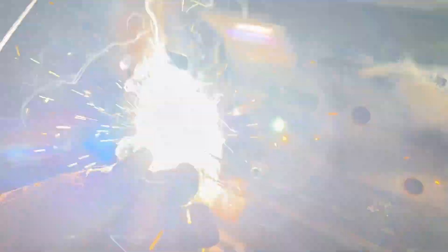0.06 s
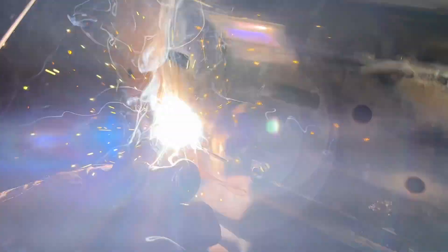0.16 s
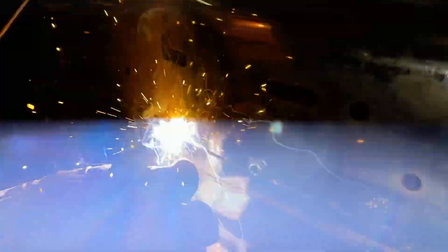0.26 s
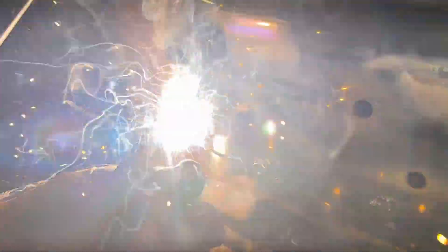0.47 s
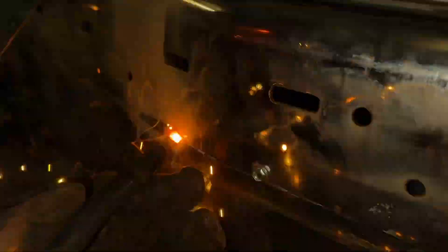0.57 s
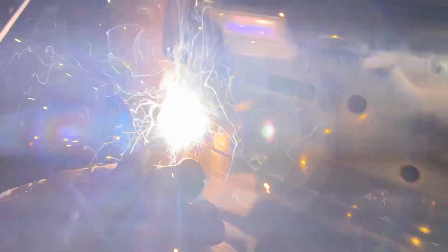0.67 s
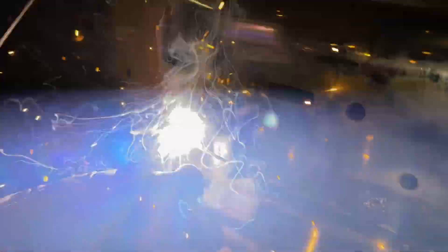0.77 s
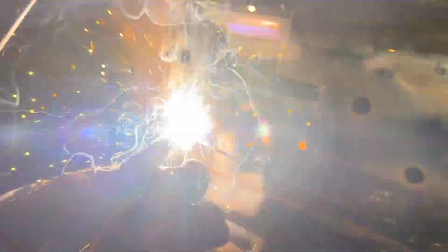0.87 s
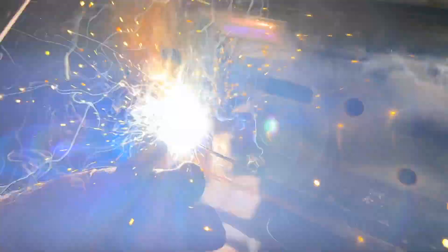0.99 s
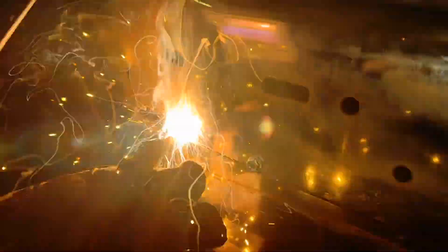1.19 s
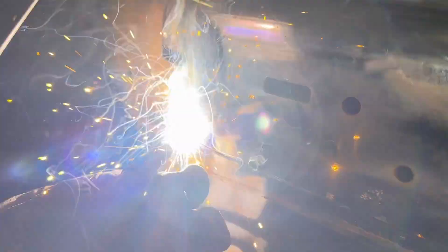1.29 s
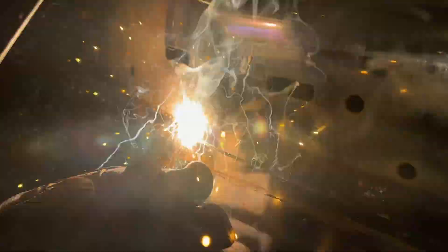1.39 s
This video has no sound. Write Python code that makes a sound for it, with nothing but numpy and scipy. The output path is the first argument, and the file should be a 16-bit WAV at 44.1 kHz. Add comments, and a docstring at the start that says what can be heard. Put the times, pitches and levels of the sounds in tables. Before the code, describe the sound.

A wire-feed welding arc crackles right by a small stereo microphone in a garage: sharp snaps and falling thumps, a brief lull with one click, then crowding thumps, thick snaps and renewed sizzle over faint hum.

```python
"""A wire-feed arc welds steel close to a small stereo microphone, over a low wavering hum.
First sharp snaps and thumps that slide from high to low, then a lull holding one flat click.
The thumps crowd in and grow before half a second, the hum swells and drops, and snaps come thick.
Another lull ends in a heavy thump; later the arc dies down once more, sizzles up and snaps to the end.
Sizzle is random clicks and hiss, snaps are ticks with noise tails, thumps are falling sine glides."""
import sys
import numpy as np
from scipy import signal
from scipy.fft import rfft, irfft, next_fast_len
from scipy.io import wavfile
from scipy.ndimage import uniform_filter1d

SR = 44100
rng = np.random.default_rng(int(sys.argv[2]) if len(sys.argv) > 2 else 0)


def master(y):
    """Save y as 16-bit WAV."""
    cut = np.clip(np.atleast_2d(y).T, -1, 1)
    pcm = np.round(cut * 32767)  # scale
    wavfile.write(sys.argv[1], SR, pcm.astype(np.int16))


N = 63945


def undb(db):
    """dB to gain."""
    return 10 ** (np.asarray(db) / 20)


def unit(x):
    """Scale to rms 1."""
    return x / np.sqrt(np.mean(x ** 2))


def curve(table):
    """Gain along a table of t/s, level/dB."""
    t, db = np.array(table).T
    return undb(np.interp(np.arange(N) / SR, t, db))


def shape(x, gain):
    """Filter by a function of frequency."""
    size = next_fast_len(N + 4096)
    hz = np.arange(size // 2 + 1) * SR / size + 1e-3  # never exactly 0
    return irfft(rfft(x, size) * gain(hz), size)[:N]


# colour of the arc close up: f/Hz, level/dB
ARC_COLOUR = [(200, -30), (500, -5.5), (1000, -8.5), (1600, -7), (2600, -12.5), (3700, -5), (5200, -11),
              (6500, -2), (8000, -10), (9200, -4), (10500, -2.5), (13000, -7), (15200, -2), (16500, -21.5)]


def colour(hz):
    """Gain of the arc's spectrum, interpolated over log frequency."""
    at, db = np.array(ARC_COLOUR).T
    return undb(np.interp(np.log(hz), np.log(at), db))


# strength of the sizzle, which dies down in the lulls: t/s, level/dB (before the lift in sizzle())
SIZZLE_LEVEL = [(0.0, -34), (0.024, -36.5), (0.088, -41), (0.096, -85), (0.112, -35.5), (0.184, -62),
                (0.192, -50.5), (0.294, -41.5), (0.318, -55), (0.326, -39), (0.366, -34.5), (0.424, -40),
                (0.428, -54.5), (0.44, -40), (0.48, -37), (0.492, -30.5), (0.58, -38.5), (0.638, -31.5),
                (0.674, -31.5), (0.682, -39), (0.73, -35), (0.742, -32), (0.754, -37.5), (0.766, -26),
                (0.818, -62.5), (0.832, -53), (0.864, -34), (0.88, -33), (0.956, -40.5), (0.972, -33),
                (0.996, -46.5), (1.004, -35), (1.086, -67), (1.098, -51), (1.114, -42), (1.122, -31.5),
                (1.158, -43), (1.182, -34), (1.222, -48.5), (1.234, -37.5), (1.244, -38), (1.28, -33),
                (1.336, -28.5), (1.352, -36.5), (1.45, -33.5)]
CLICKS_PER_S, CLICK_SPREAD_DB, HISS_DB = 1500, 4.0, -5  # hiss relative to the clicks
FLICKER_DB, FLICKER_PER_S = 1.5, 320  # flicker depth before smoothing


def sizzle():
    """Dense clicks of very uneven size over hiss, flickering together in level."""
    chance = rng.random((3, N))
    struck = chance[0] < CLICKS_PER_S / SR
    size_db = np.minimum(-CLICK_SPREAD_DB * np.log(chance[2] + 1e-9), 18)
    clicks = struck * np.sign(chance[1] - .5) * undb(size_db)
    hold = int(SR / FLICKER_PER_S)
    steps = np.repeat(rng.standard_normal(N // 20), hold)[:N]
    flicker = uniform_filter1d(steps, hold // 2)
    hiss = undb(HISS_DB) * rng.standard_normal(N)
    mix = undb(FLICKER_DB * flicker) * (unit(clicks) + hiss)
    return curve(SIZZLE_LEVEL) * 1.15 * unit(shape(mix, colour))


GLIDE_CYCLES, GLIDE_START_S, GLIDE_END_HZ = 1.2, 0.0004413, 49.6


def glide(age):
    """A sine whose pitch falls as cycles / (age + start), settling at the end pitch."""
    falling_hz = GLIDE_CYCLES / (age + GLIDE_START_S)
    hz = (falling_hz ** 4 + GLIDE_END_HZ ** 4) ** .25
    return np.sin(2 * np.pi * np.cumsum(hz) / SR)


# spits of the arc: t/s, level/dB (before SNAP_DB and colouring),
# low-mid level/dB against that level (before SNAP_LOW_DB)
SNAP_EVENTS = [(0.0096, -32, -9), (0.0475, -18, -27), (0.0615, -19, -28), (0.067, -11, -13),
               (0.0772, -16, -0.5), (0.0863, -13, -9), (0.111, -23, -11), (0.2363, -20, -10),
               (0.2705, -30, -6), (0.2984, -21.5, -14), (0.3283, -17, -14), (0.3471, -13.5, -19),
               (0.3687, -10, -8), (0.389, -14.5, -0.5), (0.4081, -21, -20), (0.4348, -22, -1),
               (0.4386, -17, 13.5), (0.451, -20, 9), (0.4652, -23.5, 16), (0.4876, -16.5, 11.5),
               (0.5143, -12.5, -34), (0.5557, -17, -23), (0.5642, -15, -14), (0.584, -13.5, -22),
               (0.5992, -16, -36), (0.633, -12, -31), (0.6388, -11, -2), (0.6487, -12, -10.5),
               (0.665, -18, -18), (0.6834, -4, -20.5), (0.6913, -9, -6), (0.698, -8.5, -14),
               (0.7033, -16, -6), (0.7424, -6.5, -9), (0.7637, -21.5, 6), (0.7778, -19, 0),
               (0.8332, -4, -18), (0.8389, -13, -13), (0.8469, -9, 3.5), (0.8653, -17, -17),
               (0.8711, -21, -29), (0.917, -14.5, -20), (0.9692, -10, -10), (0.981, -20, -22),
               (1.0067, -14.5, -11), (1.0998, -27, -12), (1.1241, -10, -10), (1.1462, -31, -6),
               (1.1805, -14, -8.5), (1.2353, -14, -24), (1.2777, -16, -34), (1.301, -19, -25),
               (1.3387, -9.5, -8), (1.346, -14, -10), (1.39, -15, -12)]
SNAP_DB, SNAP_LOW_DB, SPLIT_HZ = 3, 8.5, 5160
SNAP_TAIL_DB, SNAP_TAIL_S = -18.5, 0.0021
CRACK_RISE_S, CRACK_FALL_S, CRACK_ROUGH_DB, CRACK_LOW_HZ = 0.00015, 0.00041, 2, 1390
BODY_HZ, BODY_WIDTH_HZ, BODY_DB = 1630, 550, 3.5  # low-mid emphasis of a snap


def snaps():
    """A sharp tick with a noise tail; its low-mids are a short crack, the head of a thump's slide."""
    high, low, age = np.zeros(N), np.zeros(N), np.arange(400) / SR
    crack_env = (1 - np.exp(-age / CRACK_RISE_S)) ** 2 * np.exp(-age / CRACK_FALL_S)
    crack = glide(age) * crack_env
    noises = rng.standard_normal((len(SNAP_EVENTS), 400))
    for (t, db, low_db), noise in zip(SNAP_EVENTS, noises):
        way = np.sign(noise[0])
        tail = noise * undb(SNAP_TAIL_DB) * np.exp(-age / SNAP_TAIL_S)
        tick = np.r_[way * 3.96, tail[1:]]
        start = int(t * SR)
        high[start:start + 400] += undb(db + SNAP_DB) * tick
        # a snap that starts a thump cracks in step with it
        near = min(THUMP_EVENTS, key=lambda row: abs(row[0] - t))
        if abs(near[0] - t) < .0012:
            start, way = int(near[0] * SR), np.sign(near[3])
        rough_crack = way * crack + undb(CRACK_ROUGH_DB) * tail
        low[start:start + 400] += undb(db + low_db + SNAP_LOW_DB) * rough_crack

    def low_share(hz):
        """Low side of the split between tick and crack."""
        return 1 / (1 + (hz / SPLIT_HZ) ** 6)

    def crack_colour(hz):
        """Low-mid band with a bump at the body frequency."""
        bump_db = BODY_DB / (1 + (2 * (hz - BODY_HZ) / BODY_WIDTH_HZ) ** 2)
        return low_share(hz) / (1 + (CRACK_LOW_HZ / hz) ** 2) * undb(bump_db)

    return shape(high, lambda hz: colour(hz) * (1 - low_share(hz))) + shape(low, crack_colour)


# strikes and shorts of the arc: t/s when heard, missed start/ms (used only at a bass break),
# envelope peak level/dB (before the low-pass), push +1 or pull -1, rise/ms, fall/ms
THUMP_EVENTS = [(.0135, 3.5, -17, -1, 1.7, 40), (.026, 14.5, -10.5, 1, 0.55, 18),
                (.0625, 11.5, -15, 1, 7.2, 15), (0.0852, 0, -13, 1, 1.36, 8.5), (.1015, 0, -29, 1, 3.6, 22),
                (0.165, 6, -30, 1, 4.6, 9.9), (0.1972, 0, -17.5, -1, 20, 43), (0.24, 0, -10, 1, 4.4, 7.6),
                (.3265, 11, -9, 1, 9.4, 7.6), (0.3678, 0.5, -9, 1, 1.23, 42),
                (0.3883, 3, -5.5, 1, 1.33, 34), (0.4395, 0, -1, -1, 1.52, 13.6),
                (0.4496, 0, -7.5, 1, 2.2, 4.6), (0.4648, 0, -2.5, 1, 1.4, 16),
                (0.489, 2.5, -2.5, -1, 1.5, 9.6), (0.5032, 0, -12, 1, 2.4, 18),
                (0.548, -1, -39, 1, 1.7, 9.3), (0.6398, 0, -7.5, -1, 1.57, 9),
                (0.6927, 0, -15.5, 1, 1.85, 16), (.7, 0, -10, -1, 1, 71), (0.741, 0, -7, 1, 1.4, 42),
                (.786, 0, -29, 1, 2.5, 9.1), (0.8457, 0, -1, 1, 0.85, 57), (0.8556, 10, -1.5, 1, 1.3, 20),
                (0.956, 0, -21, 1, 3.3, 16.5), (1.001, 0, -30.5, 1, 0.55, 14),
                (1.059, -2, -30.5, 1, 4.2, 18), (1.1102, 4.5, -15, 1, 0.37, 33),
                (1.1463, 29.5, -17.5, -1, .5, 100), (1.1788, 0, -28.5, -1, 1.4, 25),
                (1.1945, 19, -10, -1, 1.25, 24.2), (1.2297, 31, -16.5, -1, 11.3, 11.8),
                (1.302, -1.5, -27, 1, 12, 18)]
# moments at which the bass breaks off: t/s
BASS_BREAKS = [.0135, .017, .026, .0625, .069, .074, .0884, .11, .3265, .336, .423, .5135, .652, .8553,
               1.098, 1.1097, 1.1463, 1.1945, 1.2302, 1.2426]


def thumps(top_hz):
    """Each thump glides down in pitch until it fades or the bass breaks off."""
    out, age = np.zeros(N), np.arange(SR // 4) / SR
    wave = glide(age)
    keep = np.exp(-2 * np.pi * top_hz / SR)  # one-pole low-pass
    for t, missed, db, way, rise, fall in THUMP_EVENTS:
        env = (1 - np.exp(-1000 * age / rise)) ** 2 * np.exp(-1000 * age / fall)
        # a thump at a break cuts in there, already under way when its start is missed
        nearest = min(BASS_BREAKS, key=lambda c: abs(c - t))
        if abs(nearest - t) < .0025:
            t = nearest
        else:
            missed = 0
        end = min([c for c in BASS_BREAKS if c > t + .0025] + [N / SR])
        push = undb(db) * np.sign(way) * wave * env / env.max()
        full = signal.lfilter([1 - keep], [1, -keep], push)
        skip, start = int(max(missed, 0) * SR / 1000), int(t * SR)
        part = full[skip:][:int(end * SR) - start]
        out[start:start + len(part)] += part
    return out


# a lone click in a lull, equal at both microphone ports: t/s, length/s, level/dB
LONE_CLICK = (.1945, .0006, -16.5)


def flat_click():
    """A flat-topped negative pulse."""
    out = np.zeros(N)
    t, length, db = LONE_CLICK
    out[int(t * SR):int((t + length) * SR)] -= undb(db)
    return out


SIDE_HISS_DB, SIDE_HISS_S = -6.5, 0.0013  # level against the arc, smoothing time of its loudness


def side_hiss(arc):
    """Separate hiss in each channel that follows the arc's loudness."""
    keep = np.exp(-1 / (SIDE_HISS_S * SR))
    loud = np.sqrt(signal.lfilter([1 - keep], [1, -keep], arc ** 2))
    return [undb(SIDE_HISS_DB) * loud * unit(shape(rng.standard_normal(N), colour)) for _ in range(2)]


# strength of the hum beneath the arc: t/s, level/dB
HUM_LEVEL = [(0, -35.5), (.1, -30), (.18, -36), (.3, -42), (.36, -36.5), (.43, -27), (.51, -19), (.53, -63),
             (.62, -44), (.7, -41), (.8, -36), (.9, -33.5), (1.0, -31.5), (1.04, -40.5), (1.1, -38.5),
             (1.18, -30.5), (1.26, -40), (1.32, -30), (1.45, -36.5)]
HUM_HZ, HUM_WIDTH_HZ = 53.1, 20.6  # width before the swells are evened out
RUMBLE_HZ, RUMBLE_DB = 117, -12.5  # rumble level against the hum


def hum():
    """Narrow-band noise wavers as a hum, flipping sign at every bass break, with a little rumble."""
    tone = unit(shape(rng.standard_normal(N),
                      lambda hz: 1 / (1 + (2 * (hz - HUM_HZ) / HUM_WIDTH_HZ) ** 2)))
    tone = tone / np.abs(signal.hilbert(tone)) ** 0.64  # partly even out its swells
    flip = (-1.) ** np.searchsorted(BASS_BREAKS, np.arange(N) / SR)
    rumble = shape(rng.standard_normal(N), lambda hz: (hz / RUMBLE_HZ) / (1 + (hz / RUMBLE_HZ) ** 3))
    return curve(HUM_LEVEL) * (unit(tone) * flip + undb(RUMBLE_DB) * unit(rumble))


FLOOR_DB = -55.5


def noise_floor():
    """Steady soft noise, independent at each port."""
    def soft(hz):
        """Rolls off at the bottom and gently towards the top."""
        return hz / (hz + 80) / (hz + 300) ** .5
    return [undb(FLOOR_DB) * unit(shape(rng.standard_normal(N), soft)) for _ in range(2)]


RIGHT_DB, RIGHT_DIP_HZ, RIGHT_DIP_DB = -0.65, 5540, -5  # the dip lies below RIGHT_DIP_HZ
RIGHT_LAG_S, RIGHT_LEAD_S, RIGHT_TURN_HZ = .000045, .000083, 4950  # lag below the turn, lead above


def right_port(arc):
    """The arc is hollower at the right microphone port, its low-mids late and its treble early."""
    def path(hz):
        """Level and delay over frequency."""
        level = undb(RIGHT_DB + RIGHT_DIP_DB / (1 + (hz / RIGHT_DIP_HZ) ** 4))
        delay = np.where(hz < RIGHT_TURN_HZ, RIGHT_LAG_S, -RIGHT_LEAD_S)
        return level * np.exp(-2j * np.pi * hz * delay)
    return shape(arc, path)


RIGHT_BASS_HZ = 604


def scene():
    """The close arc at two microphone ports, with thumps duller on the right."""
    arc = sizzle() + snaps()
    both = hum() + flat_click()
    left = arc + thumps(SR / 2)
    right = right_port(arc) + thumps(RIGHT_BASS_HZ)
    return np.array([left, right]) + both + side_hiss(arc) + noise_floor()


TOP_HZ = 16700


def record(dry):
    """The loudest peaks are rounded off and the top is cut steeply."""
    dry = dry / (1 + (np.abs(dry) / .96) ** 6) ** (1 / 6)
    return signal.sosfilt(signal.ellip(10, .2, 75, TOP_HZ, fs=SR, output="sos"), dry)


dry = scene()
out = record(dry)
master(out)
```